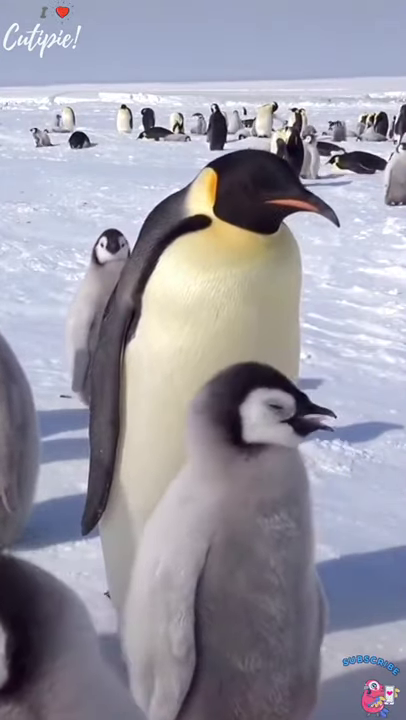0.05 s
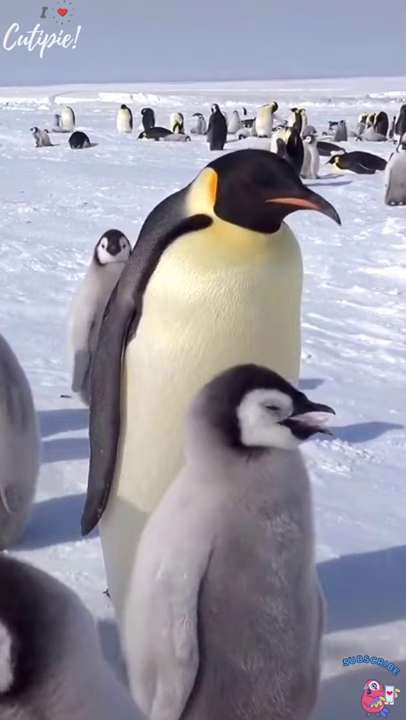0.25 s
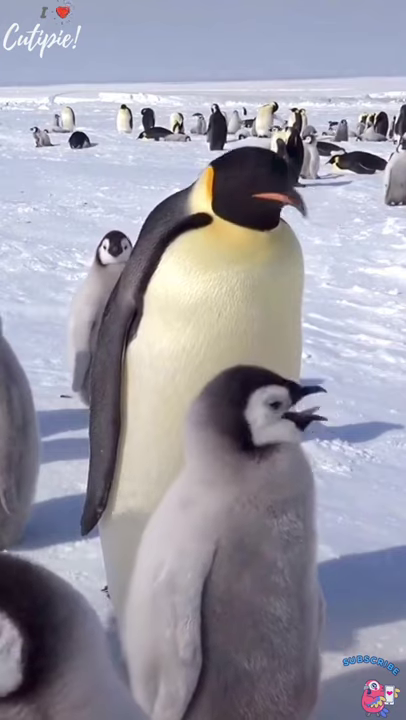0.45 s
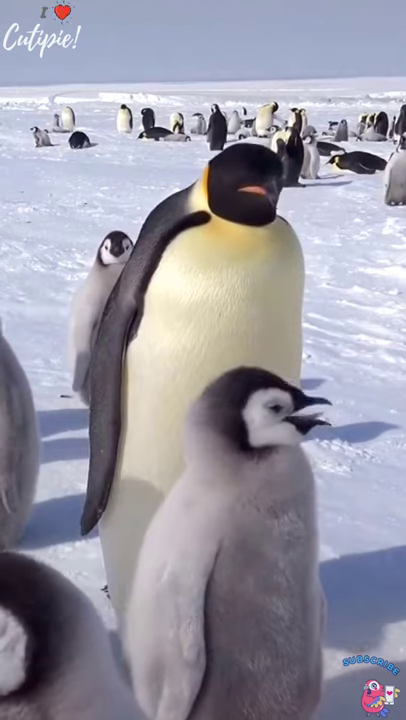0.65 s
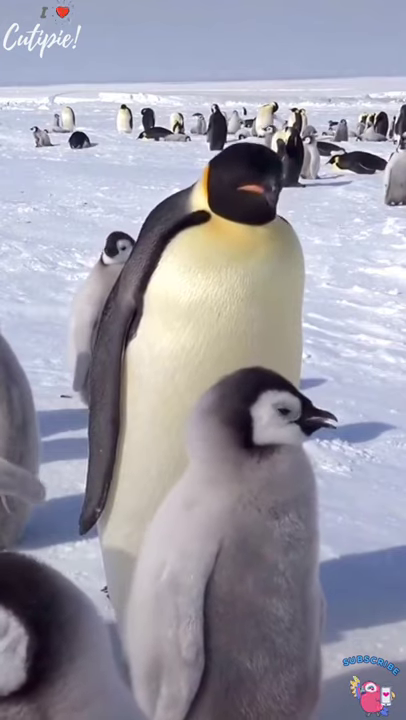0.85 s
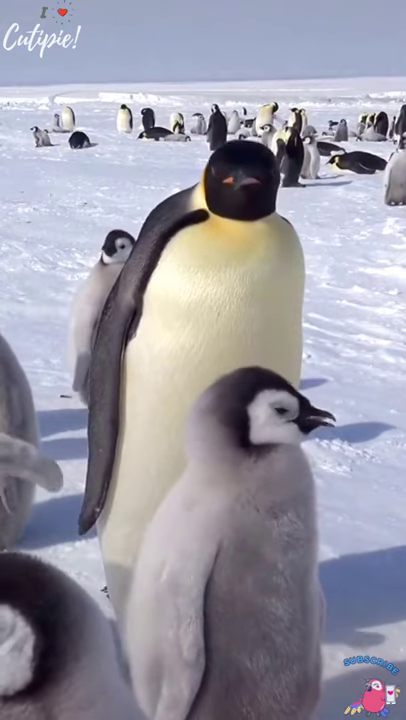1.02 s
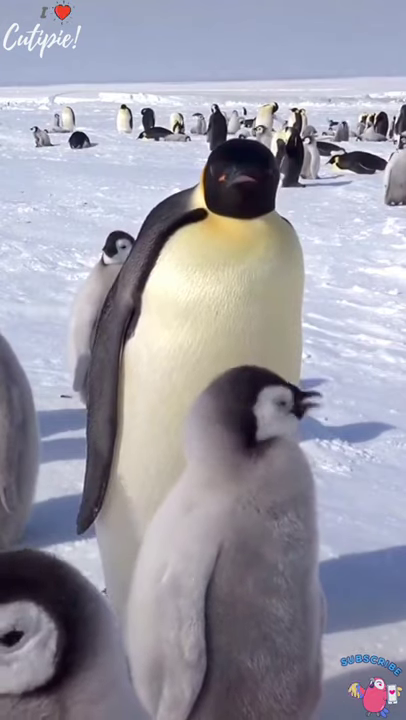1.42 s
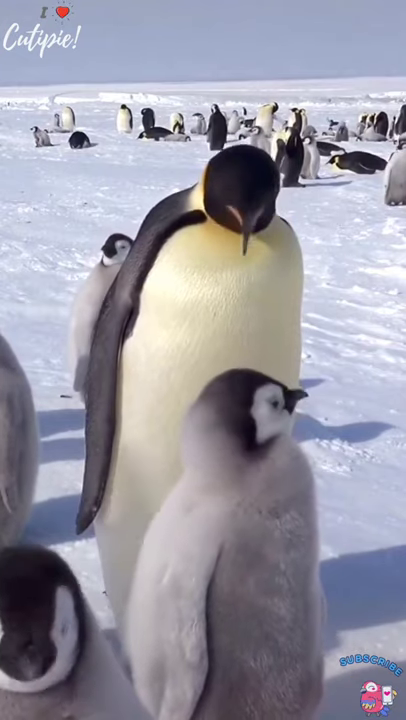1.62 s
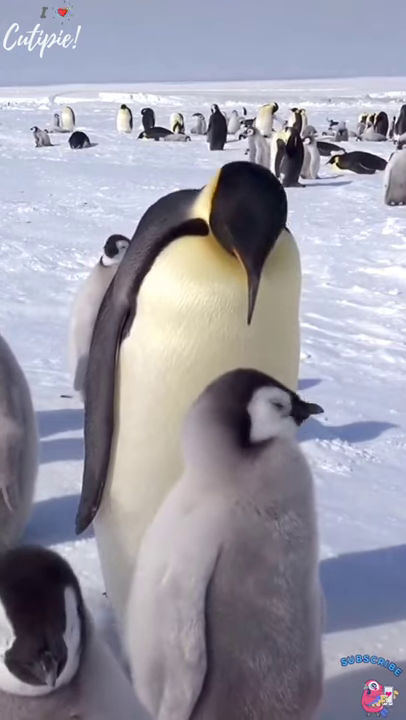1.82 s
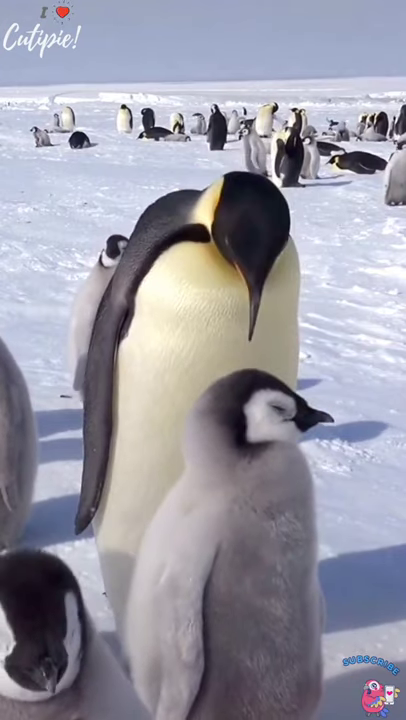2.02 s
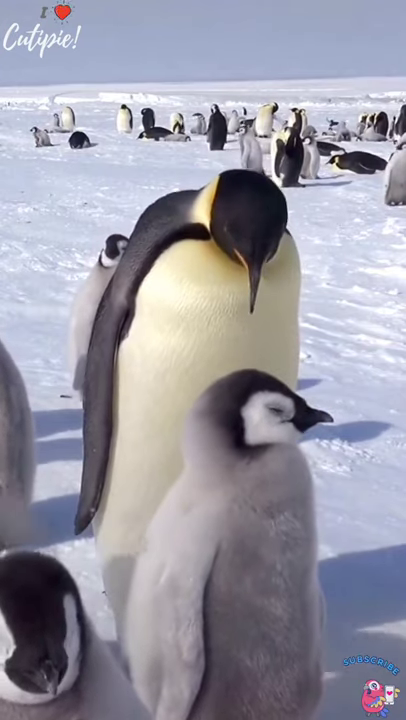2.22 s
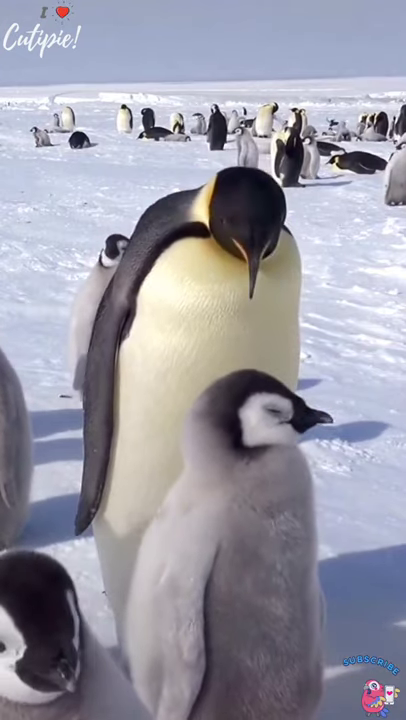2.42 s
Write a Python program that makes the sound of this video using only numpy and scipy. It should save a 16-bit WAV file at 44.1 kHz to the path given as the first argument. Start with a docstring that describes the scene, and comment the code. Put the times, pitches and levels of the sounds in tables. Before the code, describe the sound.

Shrill, warbling whistles from a nearby penguin chick, with faint chicks and low wind behind.

```python
"""Light wind rumbles on the microphone while distant emperor penguin chicks whistle over open sea ice.
Then one chick begs close by: three calls that swoop up and down and sink at the end.
Each is a rough tone with overtones and a hiss of air through the beak,
scattered by the snow and the birds standing around. The whole colony murmurs behind it."""
import sys
import numpy as np
from scipy import signal
from scipy.fft import rfft, irfft
from scipy.io import wavfile
from scipy.ndimage import uniform_filter1d

SR = 44100
rng = np.random.default_rng(int(sys.argv[2]) if len(sys.argv) > 2 else 0)


def waveform_to_disk(signal):
    """Save audio, clipped to [-1, 1], as 16-bit WAV at the path in sys.argv[1]."""
    frames = np.transpose(np.atleast_2d(signal))
    scaled = np.clip(frames, -1, 1) * 32767
    samples = np.round(scaled).astype(np.int16)
    wavfile.write(sys.argv[1], SR, samples)


N = 112454
T = np.arange(N) / SR


def from_db(db):
    """Decibels to gain."""
    return 10 ** (np.asarray(db) / 20)


def unit_power(x):
    """Scale to an RMS of 1."""
    return x / np.sqrt(np.mean(x ** 2) + 1e-20)


def eq_db(curve, hz):
    """Read an EQ curve on a log-frequency axis."""
    freqs, db = np.transpose(curve)
    return np.interp(np.log(np.maximum(hz, 1)), np.log(freqs), db)


def drift(hz):
    """A random modulator of unit power, moving at up to about this rate."""
    lowpass = signal.butter(2, hz, fs=SR, output="sos")
    return unit_power(signal.sosfilt(lowpass, rng.standard_normal(N)))


def flicker(db, hz):
    """A gain that wavers at random."""
    return from_db(db * drift(hz))


def noise(curve, side_db):
    """Coloured stereo noise of unit power; side_db sets the width."""
    colour = from_db(eq_db(curve, np.fft.rfftfreq(N, 1 / SR)))
    mid, side = irfft(rfft(rng.standard_normal((2, N))) * colour, N)
    return unit_power(mid + from_db(side_db) * side * np.array([[1], [-1]]))


def gate(start, end, edge_s):
    """Open from start to end, with soft edges outside."""
    return np.clip(1 + np.minimum(T - start, end - T) / edge_s, 0, 1) ** 2


# EQ of the wind's two bands. Each row: frequency in Hz, gain in dB.
RUMBLE_EQ = [(20, -1.5), (40, -4.5), (70, 3), (110, 1.5), (170, -3.5), (230, -14.5), (350, -32.5),
             (800, -78.5)]
FLUTTER_EQ = [(100, 11.5), (220, 4.5), (330, 1), (500, -3), (750, -12), (1200, -31), (3000, -66)]
# Their fader rides. Each row: time in seconds, level in dB.
RUMBLE_RIDE = [(0.0, -47), (0.02, -50.5), (0.25, -44), (0.3, -35.5), (0.34, -40.5), (0.43, -31.5),
               (0.98, -47), (1.0, -38.5), (1.19, -40.5), (1.49, -36.5), (1.53, -42.5), (1.61, -35.5),
               (1.88, -49.5), (1.94, -32.5), (1.99, -51), (2.04, -37), (2.31, -32), (2.55, -47.5)]
FLUTTER_RIDE = [(0.0, -51), (0.1, -55), (0.15, -54.5), (0.43, -44), (0.72, -63.5), (1.3, -59), (1.4, -47.5),
                (1.43, -56), (1.49, -47.5), (1.54, -65), (1.62, -46.5), (1.84, -47.5), (1.91, -38.5),
                (2.0, -58), (2.06, -42.5), (2.42, -43), (2.53, -59.5), (2.55, -38)]


def wind(rumble_trim_db=-1, flutter_trim_db=5.5):
    """Gusts rumble on the microphone, with a flutter higher up."""
    rumble = from_db(rumble_trim_db + np.interp(T, *np.transpose(RUMBLE_RIDE)))
    rumble = rumble * noise(RUMBLE_EQ, side_db=-32.5)
    flutter = from_db(flutter_trim_db + np.interp(T, *np.transpose(FLUTTER_RIDE)))
    flutter = flutter * noise(FLUTTER_EQ, side_db=-22.5)
    return flicker(db=2, hz=12) * (rumble + flutter)


# EQ of the distant colony. Each row: frequency in Hz, gain in dB.
MURMUR_EQ = [(400, -13), (850, -3.5), (1200, -4), (1600, 8), (2200, -14), (3000, -5), (4100, -6),
             (5500, -9.5), (7500, -12.5), (11000, -18.5), (14000, -16.5), (16000, -66)]


def colony_murmur(level_db=-57.5):
    """The whole colony blurs into a wide, gently swaying bed."""
    return from_db(level_db) * flicker(db=1.2, hz=5.2) * noise(MURMUR_EQ, side_db=-1.5)


def call_controls(contour):
    """Smoothed pitch, faintly trembling level and on-off gate of a call."""
    times, hz, db = np.transpose(contour)
    times = np.sort(times)
    pitch = uniform_filter1d(np.interp(T, times, hz), size=200)
    level_db = np.interp(T, times, db) + 0.05 * drift(hz=131)
    return pitch, level_db, gate(times[0], times[-1], edge_s=.006)


def scatter(x, count=24, first_s=0.002004, last_s=.04, t60_s=0.079, width=.62):
    """Early reflections off snow and bodies; they beat against a gliding whistle."""
    delays = rng.uniform(first_s, last_s, count)
    mid, side = rng.standard_normal((2, count))
    gains = (mid + width * side * np.array([[1], [-1]])) * from_db(-60 * delays / t60_s)
    echoes = np.array([np.interp(T - delay, T, x, left=0) for delay in delays])
    return unit_power(gains) / np.sqrt(count) @ echoes


# Overtones above the octave. Each row: multiple of the pitch, relative level in dB.
OVERTONES = [(3, -15), (4, -24), (5, -31), (6, -37), (7, -42)]
# Colour that throat and beak give the overtones. Each row: frequency in Hz, gain in dB.
THROAT_EQ = [(2000, -1), (2400, 2), (2750, -1), (3050, 0), (3550, 0.5), (4050, 5), (4550, -6), (5000, -6.5),
             (5500, -6), (6100, -1.5), (6700, -34.5), (7300, -13), (10000, -19), (12700, -4.5),
             (16000, -35)]
FULL_DB, STRAIN_HZ = -17.5, 1674  # level of a full voice; pitch above which it breaks up


def whistle(pitch, level_db, opened, octave_db, overtones_db, jitter, scatter_db):
    """A tone with overtones shaped by the throat; it trembles more as it is pushed higher."""
    on = opened > 0
    tremble = jitter * (pitch / STRAIN_HZ) ** 1.84 * drift(hz=350)
    hz = (pitch * (1 + tremble))[on]
    phase = 2 * np.pi * np.cumsum(hz) / SR
    # Overtones stand out where the voice is soft and in the low troughs of a swoop.
    lift_db = (-0.15 * (level_db - FULL_DB) - 3.5 * np.log2(pitch / STRAIN_HZ))[on]
    octave = from_db(octave_db + lift_db + eq_db(THROAT_EQ, 2 * hz)) * np.sin(2 * phase)
    tone = np.zeros(N)
    tone[on] = np.sin(phase) + octave
    for multiple, db in OVERTONES:
        gain = from_db(overtones_db + lift_db + db + eq_db(THROAT_EQ, multiple * hz))
        tone[on] += gain * flicker(db=3, hz=40)[on] * np.sin(multiple * phase)
    tone *= np.sqrt(2) * from_db(level_db) * opened
    wet = from_db(scatter_db)
    return (tone + wet * scatter(tone)) / np.sqrt(1 + wet ** 2)


def rasp_noise(curve, side_db):
    """The grit in a voice: coloured noise with a fast flicker."""
    return flicker(db=-1, hz=159) * noise(curve, side_db)


# Distant chicks, one list per call. Each point: time in seconds, pitch in Hz, level in dB.
FAR_CALLS = [
    [(0, 2133, -43.5), (.025, 2120, -51.5), (.06, 1600, -49), (.1, 1423, -45)],
    [(0, 1006, -56.5), (.035, 1324, -41.5), (.07, 1609, -38.5), (.11, 1537, -68.5), (.12, 1686, -38),
     (.127, 1900, -34), (.142, 2200, -43), (.19, 2040, -85)],
    [(.118, 1927, -55), (.128, 1607, -35), (.15, 1180, -46.5), (.2, 1042, -44)],
    [(.212, 2120, -53.5), (.24, 1477, -42.5), (.268, 2195, -39)],
    [(.49, 1510, -39.5), (.55, 1350, -42.5), (.595, 1497, -46), (.625, 1248, -43.5), (.675, 1620, -48.5),
     (.715, 1312, -43.5), (.755, 1144, -50.5)],
    [(.705, 2300, -48.5), (.745, 1900, -55.5), (.785, 2174, -45.5), (.82, 1805, -57.5)],
    [(.86, 1618, -59), (.89, 1506, -55.5), (.93, 1323, -46.5)],
    [(1.365, 2325, -39), (1.39, 1928, -31), (1.42, 1730, -48), (1.48, 1714, -44.5), (1.505, 2054, -29),
     (1.528, 2253, -49), (1.54, 2290, -42.5), (1.575, 1954, -33.5), (1.635, 1398, -48.5), (1.71, 1266, -54)],
    [(1.44, 1399, -38), (1.485, 1188, -53), (1.525, 1305, -38), (1.57, 1080, -59)],
    [(1.645, 1674, -45), (1.68, 1793, -44), (1.705, 1950, -56), (1.74, 1735, -49.5), (1.79, 1760, -62),
     (1.84, 2100, -46)],
    [(1.93, 1930, -27), (1.965, 1794, -48), (2.02, 1550, -42)],
    [(2.366, 2512, -46.5), (2.378, 2240, -29.5), (2.39, 1923, -37.5), (2.41, 1677, -42.5),
     (2.445, 1370, -43.5), (2.475, 1737, -39.5), (2.494, 1973, -40), (2.503, 2190, -30.5),
     (2.518, 2576, -48.5), (2.55, 1960, -46)],
]
# EQ of their rasp. Each row: frequency in Hz, gain in dB.
FAR_RASP_EQ = [(700, -10), (1300, -1), (2000, 12), (3100, -2.5), (4200, 4.5), (5200, -7.5), (6600, -21),
               (8000, -21.5), (11000, -33.5), (14000, -38), (16000, -41)]


def far_chicks(rasp_db=-11):
    """Chicks farther off whistle and rasp, their tone as much scattered as direct."""
    voices, rasp_gain = 0, 0
    for call in FAR_CALLS:
        pitch, level_db, opened = call_controls(call)
        level_db += drift(hz=35)  # 1 dB of flicker
        voices += whistle(pitch, level_db, opened,
                          octave_db=-21.5, overtones_db=-11.5, jitter=.022, scatter_db=0)
        rasp_gain += opened * from_db(level_db + rasp_db)
    return voices + rasp_gain * rasp_noise(FAR_RASP_EQ, side_db=-7)


def hollow_band(x, hz, depth_db=-13.5, width_hz=226):
    """A narrow dip between about 2.3 and 3.2 kHz hollows each syllable's tone."""
    freqs = np.fft.rfftfreq(N, 1 / SR)
    dip_db = depth_db * np.exp(-((freqs - hz) / width_hz) ** 2)
    return irfft(rfft(x) * from_db(dip_db), N)


# The near chick's syllables. Each row: time in seconds, pitch in Hz, level in dB.
OPENING = [(.19, 1127, -37), (.21, 1115, -37), (.216, 1022, -29), (.24, 1157, -14.5), (.267, 1024, -25),
           (.292, 1087, -16), (.299, 1236, -12), (.313, 1271, -17.5), (.342, 1103, -18), (.362, 1165, -17),
           (.386, 1315, -12), (.412, 1168, -19.5), (.438, 1154, -19), (.456, 1201, -17),
           (.485, 1170, -25.5), (.525, 1098, -29.5), (.58, 984, -42)]  # first call
SWOOP_A = [(.935, 1548, -42), (.947, 1677, -15), (.958, 1491, -17), (.976, 1323, -21), (.988, 1412, -22),
           (1.004, 1696, -12), (1.022, 1880, -18), (1.034, 2500, -19.5), (1.052, 2380, -52)]  # second call
WARBLE_A = [(1.09, 1921, -48.5), (1.113, 1820, -27.5), (1.119, 2368, -24), (1.127, 1798, -9.5),
            (1.138, 1781, -21), (1.15, 1950, -13), (1.163, 2827, -23.5), (1.172, 2320, -26),
            (1.179, 1837, -12), (1.19, 1604, -17.5), (1.208, 1490, -13.5), (1.224, 1551, -13.5),
            (1.241, 1705, -19), (1.262, 1405, -16.5), (1.286, 1251, -28), (1.316, 1365, -22.5),
            (1.352, 1193, -30), (1.40, 1182, -32.5), (1.44, 1019, -43.5)]
SWOOP_B = [(1.838, 1471, -51), (1.852, 1581, -16.5), (1.867, 1352, -21.5), (1.883, 1278, -23),
           (1.898, 1433, -21.5), (1.912, 1693, -12), (1.926, 1902, -20), (1.936, 2466, -50),
           (1.952, 1797, -38)]  # third call
YELP = [(2.024, 2408, -24.5), (2.027, 2308, -28.5), (2.032, 1838, -15), (2.041, 1747, -19.5),
        (2.051, 1858, -16.5), (2.059, 2500, -28.5), (2.07, 2890, -36)]
WARBLE_B = [(2.079, 2742, -25), (2.085, 2440, -21.5), (2.09, 1867, -11.5), (2.099, 1596, -20.5),
            (2.118, 1496, -17), (2.134, 1576, -15), (2.153, 1809, -14.5), (2.161, 2200, -31),
            (2.171, 1586, -18), (2.187, 1322, -19.5), (2.205, 1373, -24.5), (2.238, 1417, -20.5),
            (2.262, 1195, -23), (2.284, 1034, -35), (2.3, 1024, -42.5)]
# Voicing. Each row: contour, trims in dB for octave, higher overtones and rasp, peak air level in dB,
# jitter as a share of pitch at STRAIN_HZ, scatter send in dB, dip centre in Hz, right over left in dB.
SYLLABLES = [(OPENING, -25.5, -13.5, -38.5, -34.5, 0.0048, -9.5, 3180, 0.54),
             (SWOOP_A, -21.5, -3.6, -36.5, -41.5, 0.013, -5, 2335, 1.2),
             (WARBLE_A, -14, -2, -38.5, -36, 0.0082, -4, 3060, 0.019),
             (SWOOP_B, -16.5, 0, -36.5, -48.5, 0.016, -6, 3050, 3),
             (YELP, -8, -6, -30.5, -66, 0.014, -5.5, 2860, 0.93),
             (WARBLE_B, -11, -4.9, -31, -41, 0.013, -3.5, 2504, -0.7)]
# EQ of the rasp and of the breath. Each row: frequency in Hz, gain in dB.
RASP_EQ = [(500, -30), (950, -58), (1400, 1), (2100, 5.5), (2900, -7), (3800, 2.5), (5000, -6.5),
           (6100, -6), (7000, -15.5), (10000, -32), (14000, -61), (16000, -46)]
AIR_EQ = [(500, -84), (1000, -5.5), (1600, 10.5), (3000, -4.5), (4500, 3), (6500, -3.5), (9000, -7.5),
          (11000, -10.5), (14000, -8.5), (16000, -14)]


def near_chick(strain_db_per_octave=13):
    """Each syllable: a whistle, a rasp that grows with strain, a late swell of air through the beak."""
    grit = rasp_noise(RASP_EQ, side_db=-11)
    breath = noise(AIR_EQ, side_db=-2.5)
    out = 0
    for contour, octave_db, overtones_db, rasp_db, air_db, jitter, send_db, dip_hz, pan_db in SYLLABLES:
        pitch, level_db, opened = call_controls(contour)
        voice = whistle(pitch, level_db, opened, octave_db, overtones_db, jitter, send_db)
        voice *= from_db(pan_db * np.array([[-.5], [.5]]))
        strain_db = strain_db_per_octave * np.log2(pitch / STRAIN_HZ)
        rasp = opened * from_db(rasp_db + 0.99 * (level_db - FULL_DB) + strain_db) * grit
        start, end = contour[0][0], contour[-1][0]
        swell_db = np.interp((T - start) / (end - start), [0, 0.61, 1], [-23.5, 0, -11])
        air = gate(start, end, edge_s=0.027) * from_db(air_db + swell_db) * breath
        out += hollow_band(voice + rasp, dip_hz) + air
    return out


# Cracks in the near voice. Each row: start in seconds, hold in seconds, level in dB.
CRACKS = [(0.95, 0.018, -42), (1.025, 0.019, -40), (1.12, .008, -42), (1.866, 0.028, -41),
          (1.924, 0.019, -35), (2.022, 0.013, -38), (2.055, .012, -30)]
# Their EQ. Each row: frequency in Hz, gain in dB.
CRACK_EQ = [(700, -34), (1400, -11), (2200, 2.5), (3000, -3), (3800, 5.5), (5200, 3), (6200, -6),
            (6900, -10), (8000, -11.5), (10000, -25), (13500, -33), (16000, -44)]


def voice_cracks(decay_db_per_s=894):
    """The voice cracks as it starts or tops out: bursts of rasp that hold briefly and die fast."""
    envelope = 0
    for start, hold, db in CRACKS:
        decay_db = decay_db_per_s * np.maximum(T - start - hold, 0)
        envelope += gate(start, T[-1], edge_s=0.0032) * from_db(db - decay_db)
    return envelope * rasp_noise(CRACK_EQ, side_db=-5.5)


def scene():
    """Wind and colony all round, one chick up front."""
    return wind() + colony_murmur() + far_chicks() + near_chick() + voice_cracks()


def record(dry):
    """A steep high cut, 70 dB down at 16 kHz."""
    return signal.sosfilt(signal.cheby2(16, 70, 16000, fs=SR, output="sos"), dry)


dry = scene()
out = record(dry)
waveform_to_disk(out)
```